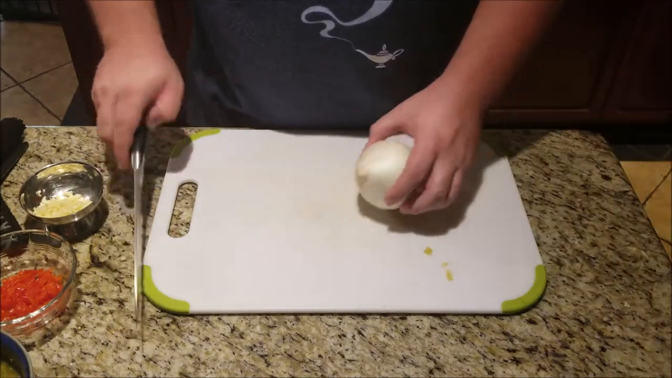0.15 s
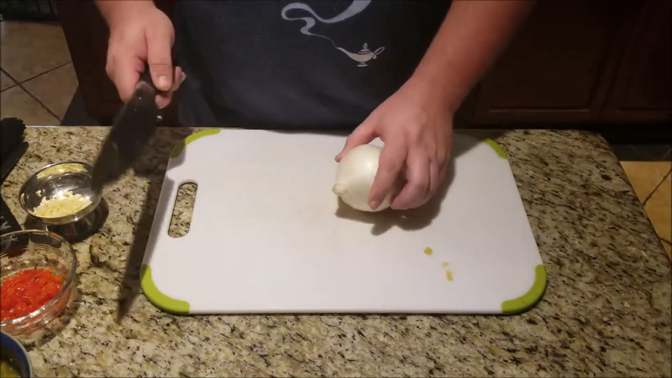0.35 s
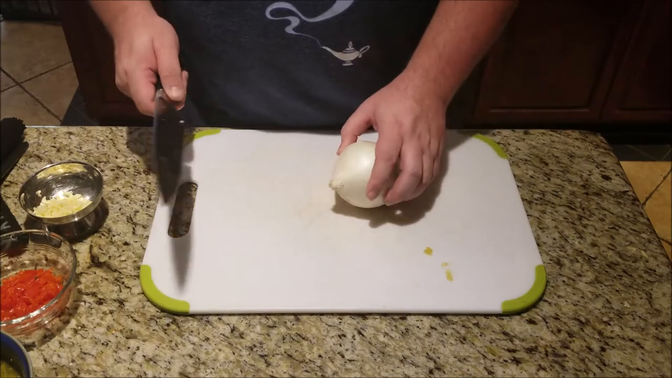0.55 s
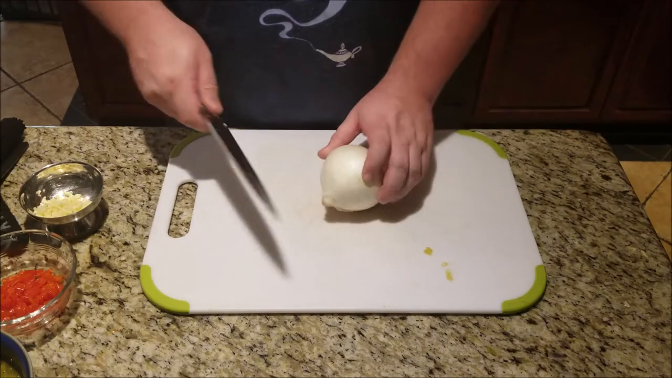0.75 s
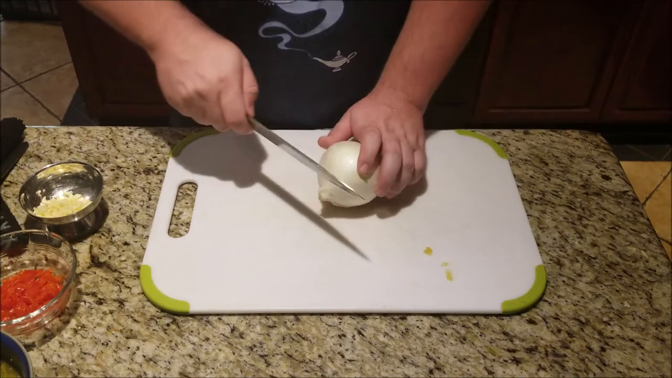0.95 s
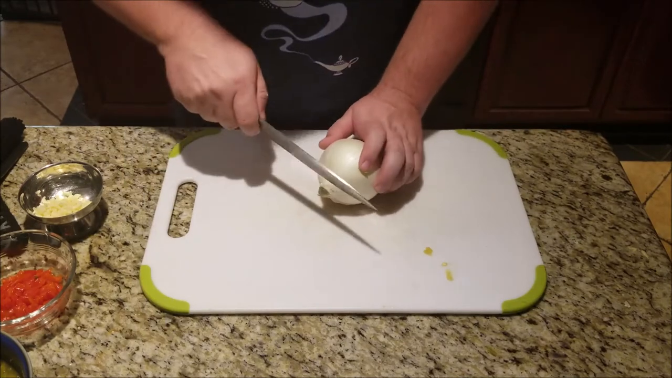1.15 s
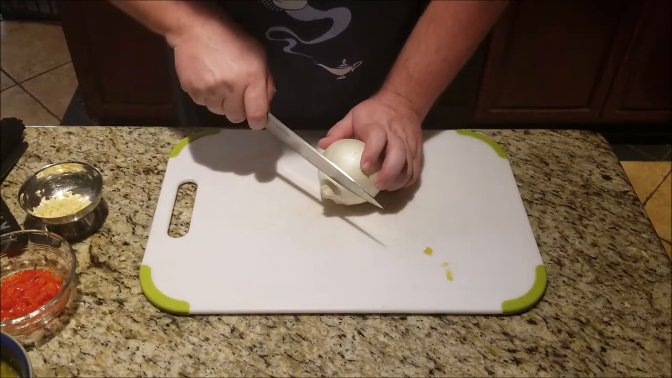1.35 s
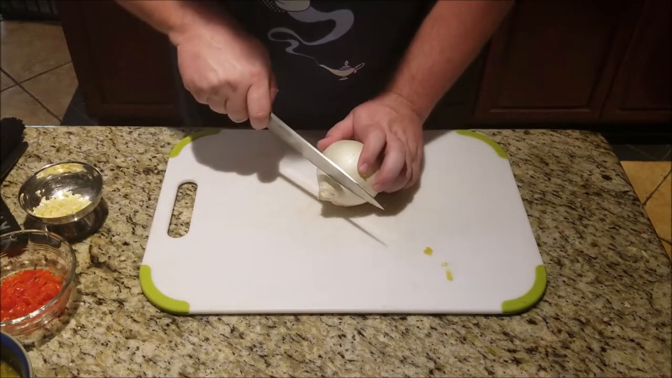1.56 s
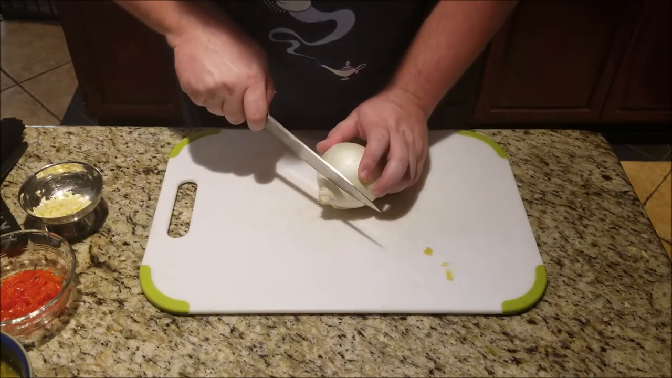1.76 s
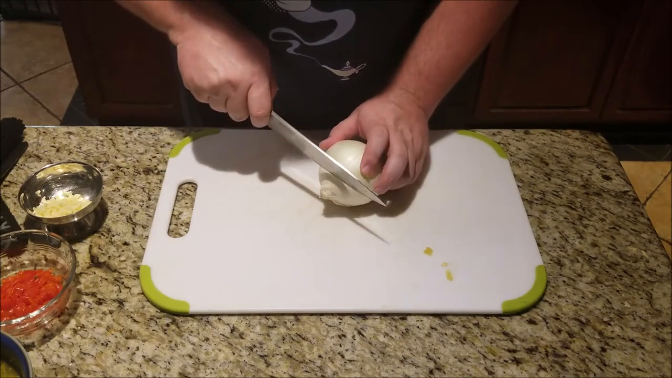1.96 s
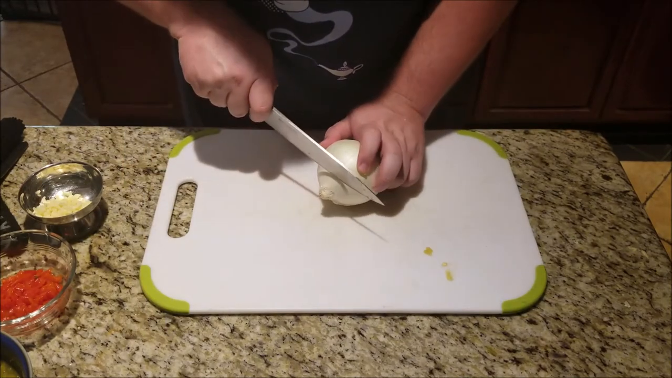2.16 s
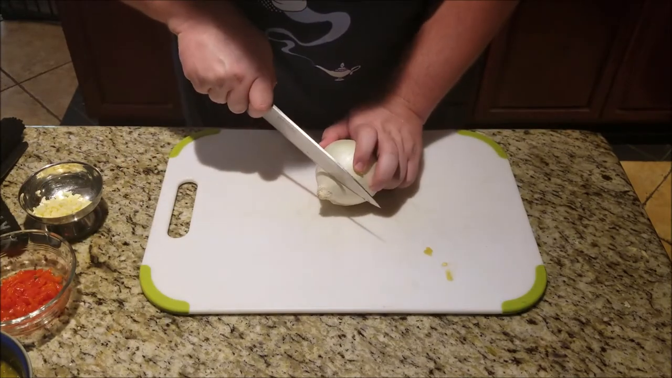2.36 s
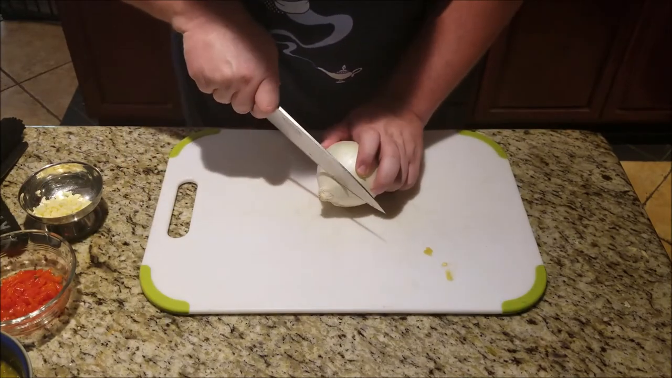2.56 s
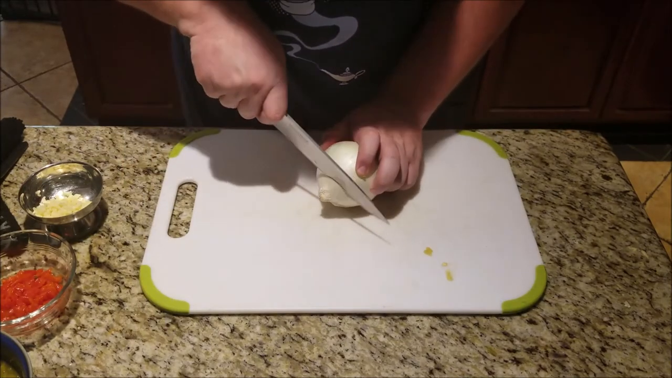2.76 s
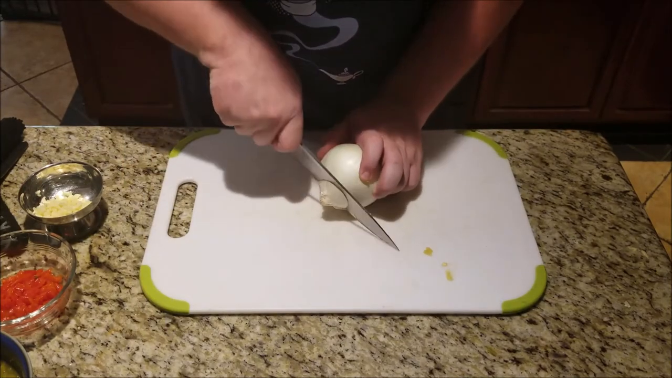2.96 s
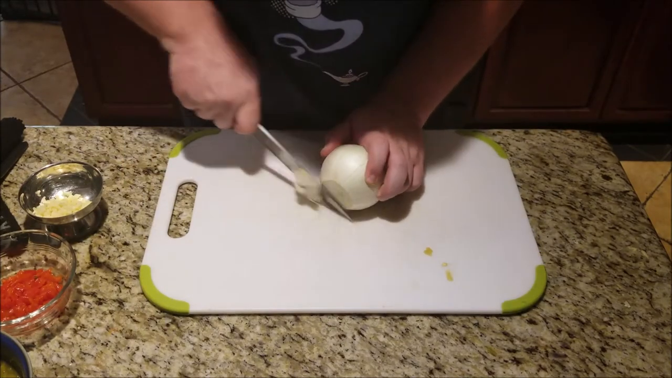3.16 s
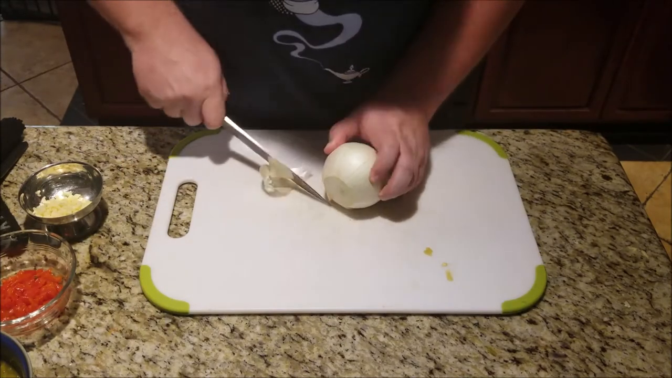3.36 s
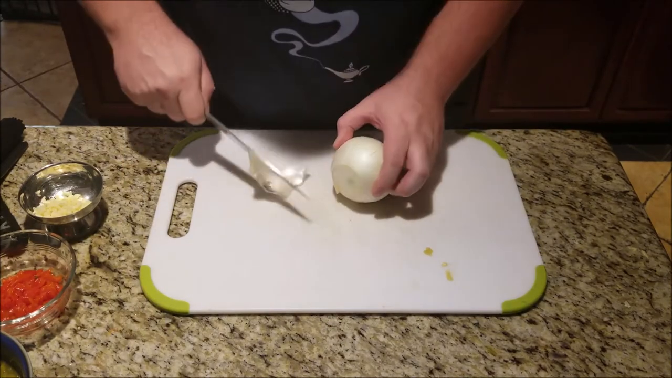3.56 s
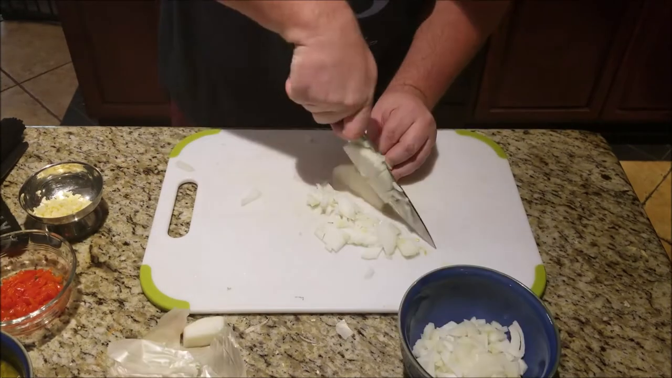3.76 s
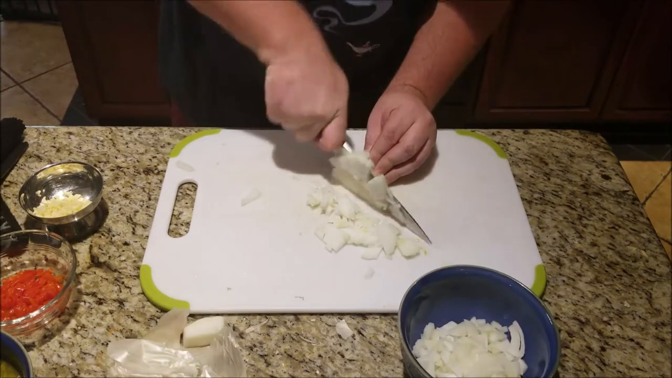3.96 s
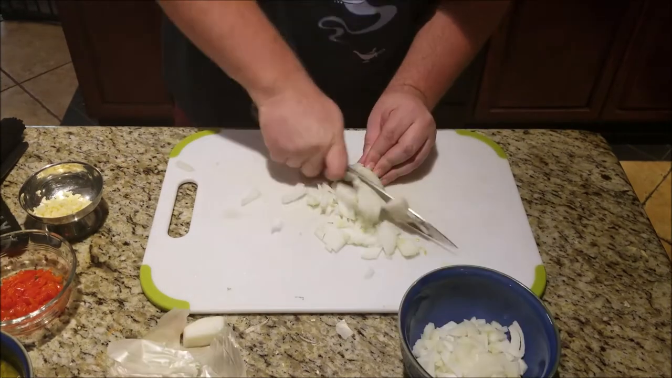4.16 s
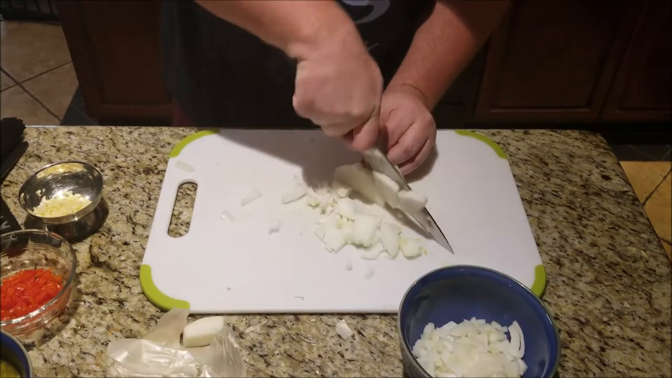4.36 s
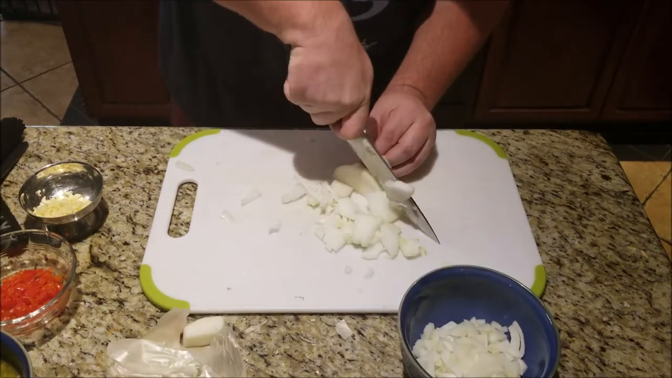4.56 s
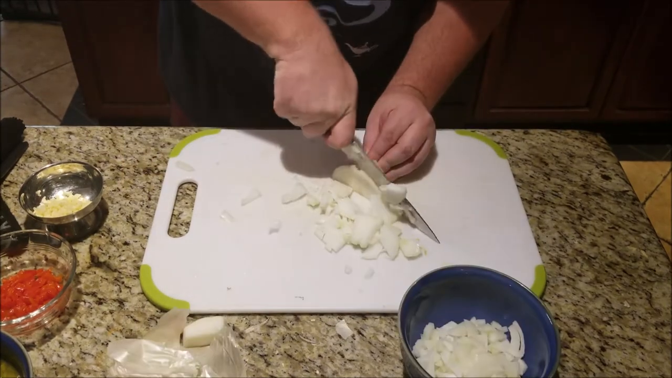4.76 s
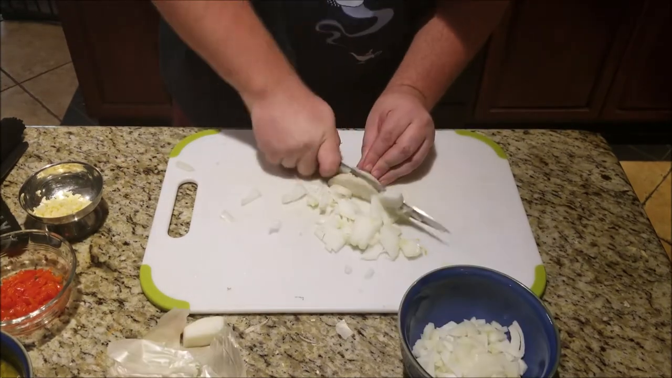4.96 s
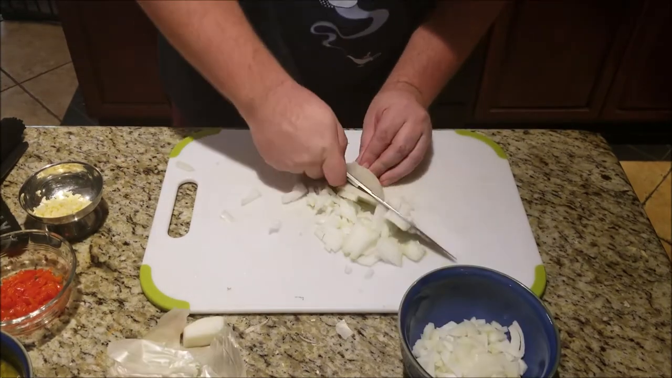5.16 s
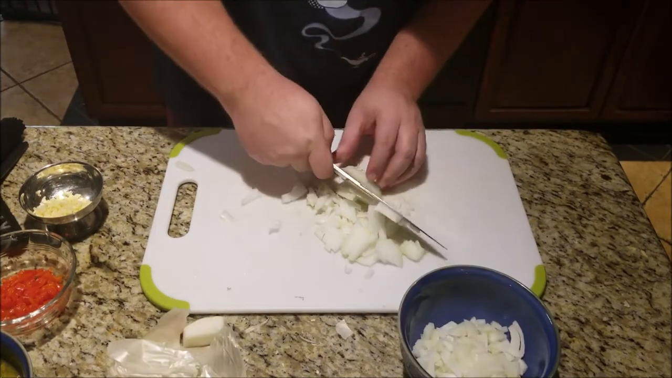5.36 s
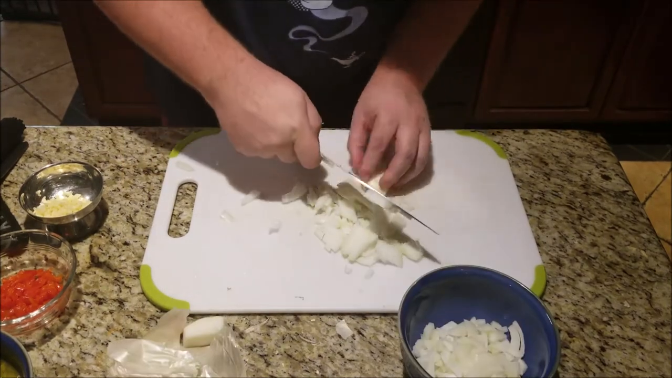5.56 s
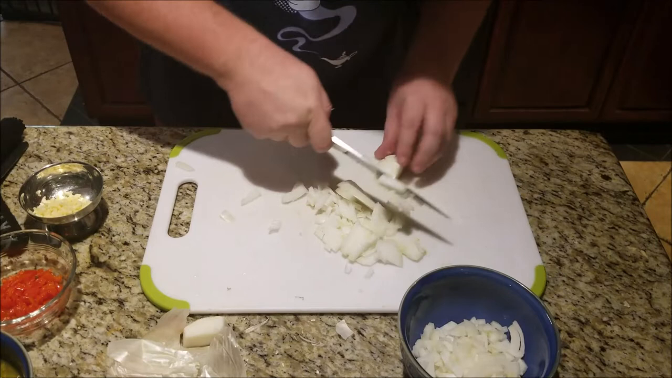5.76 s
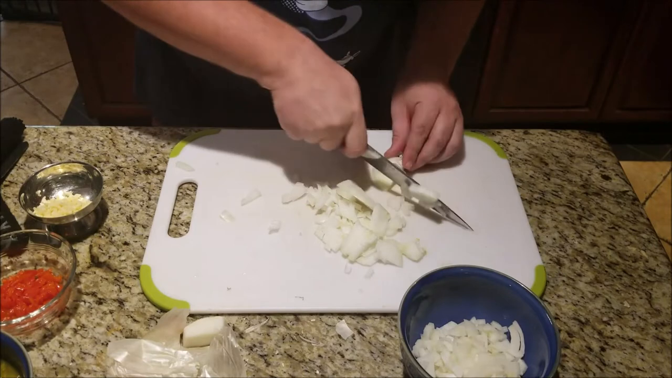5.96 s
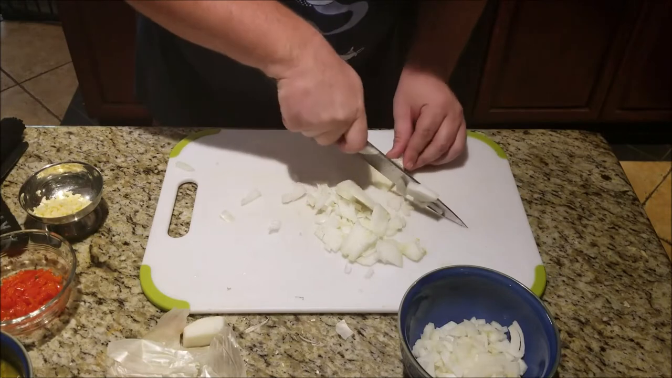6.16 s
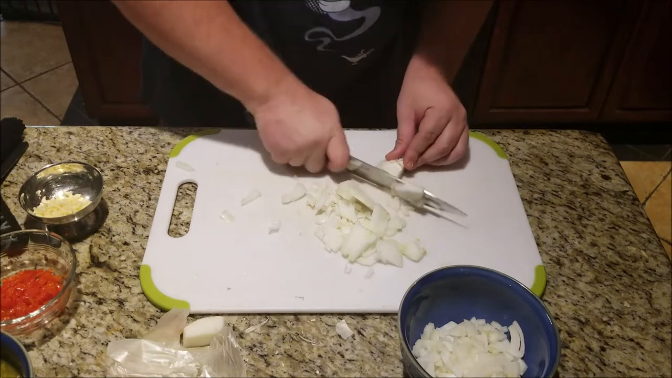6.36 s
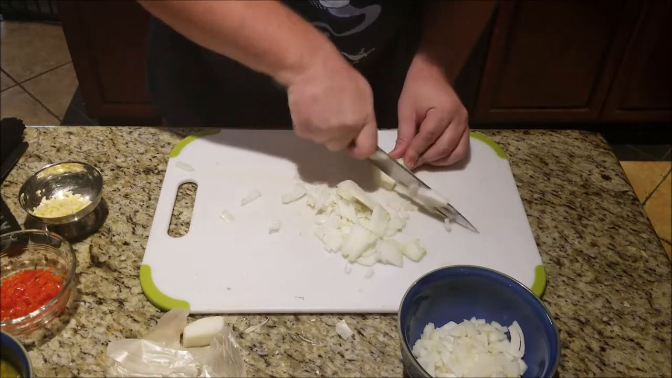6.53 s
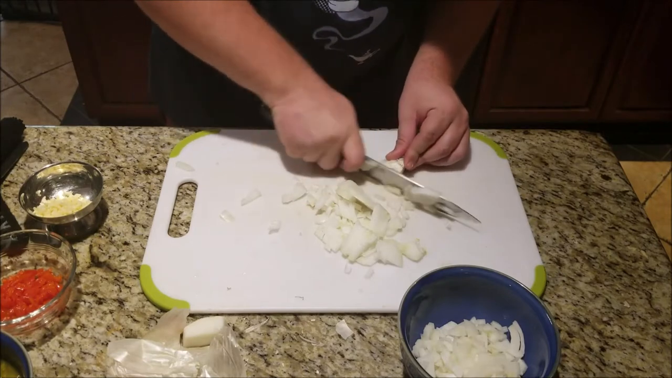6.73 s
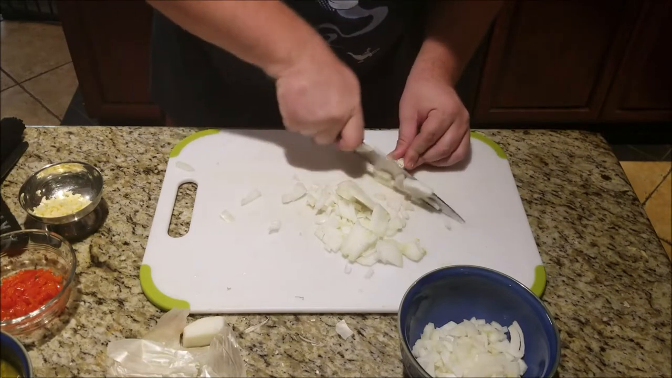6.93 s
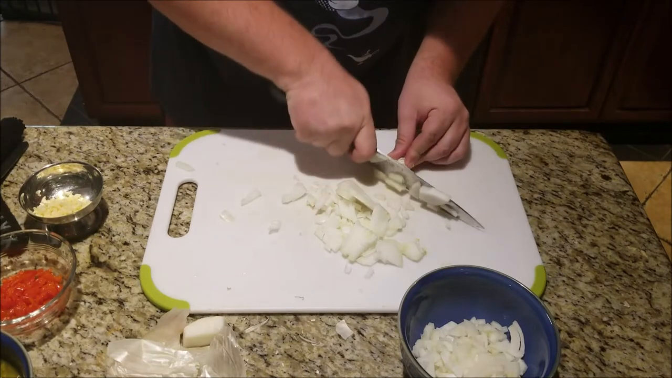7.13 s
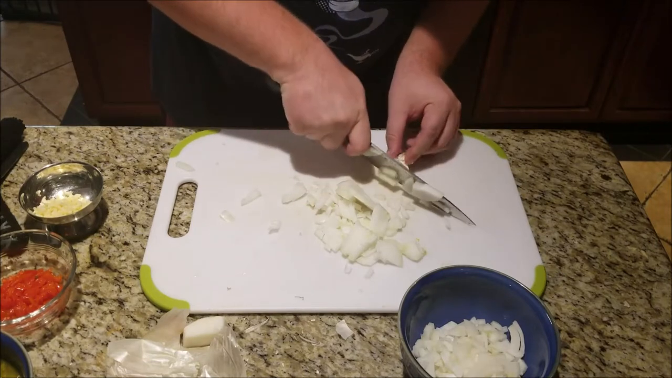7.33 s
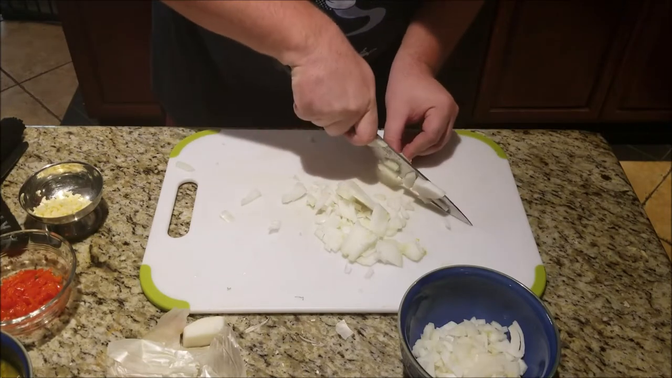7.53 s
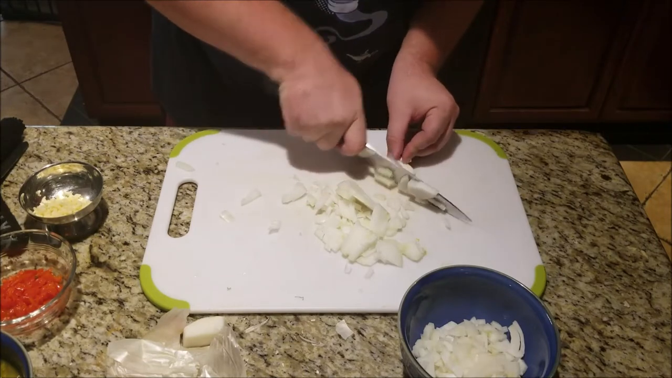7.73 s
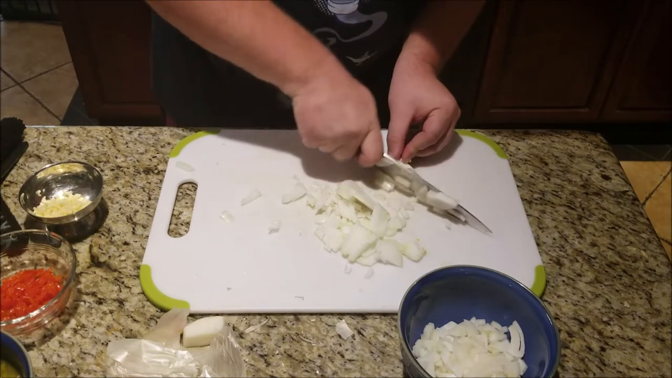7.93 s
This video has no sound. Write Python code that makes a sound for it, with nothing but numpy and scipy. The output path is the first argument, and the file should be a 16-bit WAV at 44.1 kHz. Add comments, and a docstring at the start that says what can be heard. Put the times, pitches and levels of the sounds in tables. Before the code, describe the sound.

A knife lifts off a stone counter with a thin, high metallic ring while an onion rolls softly onto a plastic board. After faint rustles, the blade crunches through in a loud burst of crackles and snaps with a sharp knock. A short lull follows, then dicing: irregular hollow knocks, some doubled, with wet crisp scrapes. Close stereo microphone, louder on the left, in a hard-walled kitchen with faint fridge hum.

```python
"""First a knife blade rings as it is lifted off a stone counter, while an onion rolls into place over a fridge hum.
Then skin and flesh crackle under the edge, which knocks and scrapes a plastic board lying on the stone.
Blade, board and counter are sums of resonances, struck or rubbed; crackle and scrape are noise of uneven grain.
A hard-walled kitchen answers with a diffuse echo; two microphone ports hear it, the left one louder."""
import sys
import numpy as np
from scipy import signal
from scipy.fft import rfft, irfft, next_fast_len
from scipy.io import wavfile
from scipy.ndimage import uniform_filter1d

SR = 44100
rng = np.random.default_rng(int(sys.argv[2]) if len(sys.argv) > 2 else 0)


def dump_mix(stems):
    """Bounce the given channels to the path in sys.argv[1] as a 16-bit WAV at rate SR."""
    frames = np.atleast_2d(stems).T  # one column per channel
    limited = np.clip(frames, -1, 1)  # hard clip at full scale
    pcm = np.round(limited * 32767).astype(np.int16)
    wavfile.write(sys.argv[1], SR, pcm)


def to_linear_factor(level_db):
    """Convert decibel levels (scalar or array-like) to linear amplitude factors."""
    exponent = np.asarray(level_db, float) / 20
    return 10 ** exponent


N = 352447
TIME = np.arange(N) / SR
PADDED = next_fast_len(N)
FREQ = np.arange(PADDED // 2 + 1) * SR / PADDED + 1e-3  # Hz, kept above zero

# Blade modes: f/Hz, level/dB before weighting by decay, t60/s
BLADE_MODES = [(7600, -14, .3), (8890, -12, .2), (10380, -14, .3), (10960, -9, .25), (11024, -6, .3),
               (11930, -8, .35), (12030, -7, .35), (12320, -6, .15), (12415, -2, .3), (12540, -2, .12),
               (13770, -2, .35), (13870, -7, .15), (14005, -5, .35), (15230, -8, .25)]
# Contact of blade and stone: t/s, level/dB
BLADE_CONTACT = [(0, -38), (.02, -37), (0.051, -53), (.085, -45.5), (.105, -72)]
# Moves of edge, fingers and onion: start t/s, length/s, crackle level/dB, its swell over the move/dB,
# level of the drag on the board/dB
MOVES = [(0., 0.018, -46.5, 8, -54.5), (0.051, 0.032, -50, 5.5, -53), (0.092, 0.15, -59.5, -9.5, -53.5),
         (0.258, .16, -65.5, 4, -68.5), (0.422, .1, -77, 1, -70), (.545, 0.12, -65, -7.5, -66.5),
         (0.644, .18, -77.5, 18.5, -61), (0.854, 0.1, -66, 4.5, -66.5), (1.046, .05, -61.5, -3.5, -87.5),
         (1.2, 0.42, -74, -11, -91.5), (1.581, .12, -65.5, -6.5, -102), (1.985, 0.33, -79, 13, -82),
         (2.313, 0.059, -57.5, -7.5, -68), (2.455, 0.081, -68.5, 6, -79.5), (2.574, .04, -54, 0, -72),
         (2.62, 0.032, -44.5, 4.5, -59.5), (2.751, .1, -31, -4, -50), (2.86, 0.029, -32, 5.5, -51.5),
         (2.887, 0.014, -34.5, -16, -32), (2.944, 0.11, -40.5, 5, -48.5), (3.033, 0.046, -31, 11.5, -48),
         (3.09, 0.12, -20, -13, -46.5), (3.317, 0.095, -95, -9, -65), (3.453, 0.011, -58.5, -2, -77),
         (3.808, 0.087, -76, 6, -69), (3.877, .13, -43, 11.5, -36), (3.996, .06, -36, 0, -36.5),
         (4.096, .14, -61.5, -2, -47), (4.299, .24, -75, -8, -62.5), (4.647, .065, -44.5, -6, -41.5),
         (4.711, 0.23, -42.5, 6, -32.5), (5.046, 0.099, -59.5, 0.5, -53), (5.399, 0.061, -79.5, 1.5, -74),
         (5.472, 0.071, -70.5, 8, -63.5), (5.556, 0.13, -72.5, 7, -64.5), (5.874, .1, -90, -4, -71.5),
         (5.993, .045, -57.5, -14.5, -36.5), (6.112, .17, -75.5, 8.5, -54), (6.314, .025, -48.5, 10.5, -40),
         (6.354, 0.084, -59, 2, -46.5), (6.543, .1, -62, 2, -56), (6.642, 0.034, -34.5, -2, -35.5),
         (6.845, .095, -68, 12, -51.5), (6.939, 0.059, -42, 7, -38.5), (7.148, .085, -72, 5.5, -58),
         (7.367, 0.13, -72.5, 3.5, -75), (7.728, .04, -70.5, 20, -74), (7.777, 0.035, -35, -13, -39),
         (7.86, 0.14, -58, -16, -54.5)]
# Spread of grain size, dry skin first, diced flesh after: t/s, level/dB per unit of size
GRAIN_SPREAD = [(0, -1.5), (3.3, 4.5), (3.6, 3), (8, -0.5)]
# Relative spectrum of crackle: f/Hz, level/dB
CRACKLE_SPECTRUM = [(2940, -17.5), (5000, -13), (6050, -13.5), (6520, -5), (7160, -7.5), (8880, -13.5),
                    (12600, -1), (15200, -4.5), (15900, -17.5), (16300, -24.5), (16500, -39.5)]
# Relative spectrum of scrape: f/Hz, level/dB
SCRAPE_SPECTRUM = [(710, -29), (1200, -10.5), (1880, -11.5), (2030, -6.5), (2240, -7.5), (2730, -9),
                   (6000, -12.5), (7800, -24), (13200, -120)]
# Board modes before the changes at each contact: f/Hz, level/dB, t60/s
BOARD_MODES = [(362, -13, .12), (431, -20, .12), (612, 0, .15), (668, -3, .12), (748, -10, .11),
               (828, -15, .11), (945, -15, .11), (1020, -19, .1), (1088, -13, .11), (1180, -15, .1),
               (1315, -16, .09), (1410, -19, .09), (1501, -14, .1), (1674, -18, .1), (1780, -17, .09),
               (1950, -23, .09), (2120, -23, .07), (2350, -23, .06)]
# Roll of the onion: t/s, level/dB
ONION_ROLL = [(0, -51.5), (.1, -50.5), (.4, -56), (.56, -58.5), (0.802, -58.5), (1.03, -59.5), (1.07, -73),
              (1.3, -72.5)]
# Resonances of the gap under the board: f/Hz, width/Hz, level/dB
HOLLOW_MODES = [(323.7, 5.1, 8), (376, 17, -4.5), (442.4, 29, -7.5), (894, 55, -16), (1430, 73, -20)]
# Fridge tones: f/Hz, middle level/dB rms, waver/dB
FRIDGE_TONES = [(51.3, -69, 1.5), (116.4, -68, 3), (147.2, -68.5, 2.5)]
# Relative spectrum of air and microphone hiss: f/Hz, level/dB
AIR_SPECTRUM = [(12, -46.5), (20, -28.5), (37, -2), (71, -6.5), (151, -6.5), (174, -10.5), (492, -14.5),
                (583, -32), (1210, -26), (1600, -43), (5360, -39), (6710, -29.5), (9410, -50.5),
                (13600, -28), (16500, -56)]
# Power share of the hiss common to both ports: f/Hz, share
AIR_LIKENESS = [(130, .92), (290, 0.91), (640, 0.29), (1400, .02)]
# Blows on the board: t/s, level/dB before the low cut, off-centre lift of side modes/dB, damping factor, #
# hardness lift of top modes/dB
KNOCKS = [(0.088, -31.5, 9, 2.3, 25), (0.107, -34, 12.5, 1.2, 13), (0.276, -40.5, 1, 1.4, 2),
          (2.622, -50, 9.5, 0.61, -1.5), (2.898, -5, 6.5, 1.95, 4.5), (3.002, -33.5, 6, 2, 9.5),
          (3.883, -27.5, -8, 1, -14), (3.905, -20.5, 13, 1.7, -4), (3.924, -18, 11.5, 1.24, -1),
          (4.067, -21, 30, 4.8, -2), (4.143, -31.5, -3, 2, -11), (4.186, -36.5, -3, 2.4, 1.5),
          (4.224, -39, 0, 1.2, -13.5), (4.34, -47.5, -2, 2.7, -6), (4.526, -44, -5, 1.9, -6),
          (4.65, -30, 5, 0.52, 1), (4.723, -13, 7.5, 1.75, -2.5), (4.744, -22, 12.5, 1.1, -4),
          (4.792, -22, 3, 0.59, -9), (4.958, -27.5, 23, 2.8, -7), (5.698, -38, -14, 2.2, -16.5),
          (5.885, -49.5, 13, 1.34, -2.5), (5.993, -9.5, 5.5, 1.57, 6), (6.314, -28, 10, 0.73, 8.5),
          (6.403, -33.5, 20.5, 1.7, 17), (6.643, -22, 13, 0.95, 7), (6.941, -31, 27, 2.9, 2.5),
          (6.961, -13.5, 9, 1.23, -2.5), (7.777, -34, 13, 1.3, 6), (7.808, -31.5, 17, 2.6, 2)]
# Thuds carried by the counter: t/s, peak level/dB, f/Hz, t60/s
THUDS = [(0.281, -42, 90, 0.36), (3.9, -47, 93.5, 0.48), (3.998, -50, 69.5, .3), (4.077, -45.5, 74, 0.26),
         (4.72, -48.5, 86, 0.58), (4.96, -49.5, 87, 0.35), (6.36, -49.5, 70, .3), (7.798, -49.5, 71, 0.37)]
# Snaps of skin and flesh: t/s, peak level/dB before colouring
SNAPS = [(0.8091, -45), (1.2613, -44), (1.405, -43.5), (1.5866, -45), (2.318, -35), (2.3496, -36.5),
         (2.52, -44), (2.579, -31.5), (2.614, -35.5), (2.7557, -12), (2.7743, -8.5), (2.8254, -19.5),
         (2.9, -10.5), (2.9225, -2.5), (2.9802, -20.5), (3.004, -15.5), (3.0313, -10), (3.042, -12),
         (3.067, -0.5), (3.0907, -3.5), (3.096, -5), (3.463, -41.5), (3.8087, -35.5), (6.9885, -9),
         (7.7244, -41)]
# Squeaks of wet flesh on steel: t/s, length/s, f/Hz, level/dB rms before the fades
SQUEAKS = [(2.098, 0.084, 2346, -76), (2.287, 0.04, 2270, -69.5), (2.457, 0.038, 2280, -70.5),
           (5.47, .1, 2797, -66.5), (7.542, 0.029, 5050, -66.5)]
# Power share of other noise common to both ports: f/Hz, share
LIKENESS = [(100, 0.97), (600, 0.75), (1500, 0.58), (3000, 0.047), (12000, .02)]
# Reverberation of the kitchen: f/Hz, t60/s
ROOM_DECAY = [(200, 0.17), (1000, 0.46), (5000, 0.54), (13000, 0.29)]
# Left port above right port: f/Hz, level/dB
LEFT_LEAN = [(60, 4.5), (600, 4.5), (1500, 4.5), (4000, 4.5), (12000, 6)]


def unit(x):
    """Normalisation: scale to rms 1."""
    return x / np.sqrt(np.mean(x ** 2))


def over(table, hz):
    """Interpolation: read a table of f/Hz and value on a log-frequency axis."""
    f, value = np.transpose(table)
    return np.interp(np.log(hz), np.log(f), value)


def shape(table):
    """Spectral envelope: gain of a table of f/Hz and level/dB, falling away below its lowest point."""
    return to_linear_factor(over(table, FREQ)) * np.minimum(FREQ / table[0][0], 1) ** 2


def colour(x, gain):
    """Linear filtering: multiply the spectrum by a gain given at every frequency."""
    return irfft(rfft(x, PADDED) * gain, PADDED)[..., :N]


def peak(hz, width):
    """Resonance: causal response of one mode, gain 1 at its centre."""
    return 1 / (1 + 1j * (FREQ ** 2 - hz ** 2) / (FREQ * width))


def ports(likeness):
    """Spatial coherence: noise at two ports, sharing a given part of its power at each frequency."""
    like = np.clip(over(likeness, FREQ), 0, 1)
    common, left, right = rfft(rng.standard_normal((3, PADDED)))
    own = np.array([left, right])
    return irfft(np.sqrt(like) * common + np.sqrt(1 - like) * own, PADDED)[:, :N]


def walk(rate):
    """Random modulation: levels drawn at a rate per second, joined by ramps; rms near 1."""
    k = int(SR / rate)
    steps = np.repeat(rng.standard_normal(N // k + 1), k)
    return unit(uniform_filter1d(steps, k)[:N])


def add(out, s, x):
    """Superposition: mix a sound in at time s."""
    i = int(s * SR)
    out[..., i:i + x.shape[-1]] += x[..., :N - i]


def ring(hz, db, t60, phase, rise_s):
    """Free vibration: a sum of damped modes with a short rise, peak 1."""
    t = TIME[:int(.4 * SR), None]
    decay = np.exp(-np.log(1000) * t / t60)
    x = (to_linear_factor(db) * np.sin(2 * np.pi * hz * t + phase) * decay).sum(1)
    x = x * (1 - np.exp(-t[:, 0] / rise_s))
    return x / np.abs(x).max()


def blade():
    """Friction-driven resonance: rough stone shakes the steel, which rings on once it is in the air."""
    s, db = np.transpose(BLADE_CONTACT)
    force = to_linear_factor(np.interp(TIME, s, db, right=-120))
    # a mode's bandwidth is about 2.2 / t60
    steel = sum(to_linear_factor(level) * np.sqrt(t60) * peak(hz, 2.2 / t60) for hz, level, t60 in BLADE_MODES)
    return unit(colour(ports(LIKENESS) * force, steel)) * np.sqrt(np.mean(force ** 2))


def efforts():
    """Power addition: levels of crackle and drag in dB; each move enters fast, holds and dies away."""
    attack, sag = 6000, 27.5  # dB/s: entry of every move; the drag tires while it lasts
    crackle_stop, drag_stop = 379, 168.5  # dB/s
    settle_db, settle = -24.5, 118.5  # dB, dB/s: cut pieces crackle on faintly after the edge stops
    rest_crackle_db, rest_drag_db = -78.5, -86  # hands are never quite still
    t = np.arange(0, N / SR + .002, .001)
    s, length, crackle_db, swell_db, drag_db = np.transpose(MOVES)[:, :, None]
    before = np.maximum(s - t, 0)
    during = np.clip(t - s, 0, length)
    after = np.maximum(t - s - length, 0)

    # the factor 2 in amp turns levels into powers
    stop = to_linear_factor(-2 * crackle_stop * after) + to_linear_factor(2 * (settle_db - settle * after))
    crackle = to_linear_factor(2 * (crackle_db + swell_db * during / length - attack * before)) * stop
    drag = to_linear_factor(2 * (drag_db - sag * during - drag_stop * after - attack * before))

    def level(power, rest_db):
        """Power sum of all moves and the rest level, in dB."""
        return np.interp(TIME, t, 10 * np.log10(power.sum(axis=0) + to_linear_factor(2 * rest_db)))

    return level(crackle, rest_crackle_db), level(drag, rest_drag_db)


def grain():
    """Granular fracture: tiny breaks of uneven size, with slow changes of loudness levelled out."""
    sizes = np.repeat(np.minimum(rng.exponential(size=N // 24 + 1), 5.5), 24)[:N]
    spread_db = np.interp(TIME, *np.transpose(GRAIN_SPREAD))
    grains = to_linear_factor(spread_db * (uniform_filter1d(sizes, size=16) - 2.5))
    # cell layers give way in uneven bunches
    grains = grains * to_linear_factor(2.2 * walk(120))
    return grains / np.sqrt(uniform_filter1d(grains ** 2, size=2000))


def strokes():
    """Friction and fracture: dense breaks hiss, scrape, and shake the board while the edge moves."""
    crackle_db, drag_db = efforts()
    crackle_share = 0.37  # part of the scrape level that follows crackle; the rest follows drag
    scrape_db = crackle_share * crackle_db + (1 - crackle_share) * drag_db - 3
    noise = ports(LIKENESS) * grain()
    hiss = to_linear_factor(crackle_db) * unit(colour(noise, shape(CRACKLE_SPECTRUM)))
    scrape = to_linear_factor(scrape_db) * unit(colour(noise, shape(SCRAPE_SPECTRUM)))

    # rubbing drives the board without pause, so the modes sound broader than after a blow
    board = 0
    for k, (hz, db, t60) in enumerate(BOARD_MODES):
        rubbed_db = db - 0.94 * (abs(hz - 650) > 60)
        board = board + (-1) ** k * to_linear_factor(rubbed_db) * peak(hz, 5.0 / t60)
    board = board / (1 + (FREQ / 2300) ** 6)
    force = ports(LIKENESS) * to_linear_factor(drag_db + 4.82 * walk(40))
    drag = unit(colour(force, board)) * np.sqrt(np.mean(to_linear_factor(drag_db) ** 2))
    return hiss + scrape + drag


def onion():
    """Cavity resonance: an uneven roll hums in the gap under the board."""
    s, db = np.transpose(ONION_ROLL)
    push = ports(LIKENESS) * to_linear_factor(1.1 * walk(16))
    gap = sum(to_linear_factor(level) * peak(hz, width) for hz, width, level in HOLLOW_MODES)
    return unit(colour(push, gap)) * to_linear_factor(np.interp(TIME, s, db, right=-120))


def kitchen():
    """Steady sources: fridge tones wavering in level and phase over air and microphone hiss."""
    hum = 0
    for hz, db, waver_db in FRIDGE_TONES:
        level = np.sqrt(2) * to_linear_factor(db + waver_db * walk(13))
        hum = hum + level * np.sin(2 * np.pi * hz * TIME + 0.41 * waver_db * walk(10))
    air = unit(colour(ports(AIR_LIKENESS), to_linear_factor(over(AIR_SPECTRUM, FREQ))))
    return hum + to_linear_factor(-63.5) * air


def knocks():
    """Modal excitation: each blow rings the board modes in its own mix; board slaps stone with a clack."""
    low_share, clack_db = 0.65, -16  # off-centre lift taken under 500 Hz; burst level relative to the blow
    out, clacks = np.zeros((2, N)), np.zeros((2, N))
    hz, db, t60 = np.transpose(BOARD_MODES)
    for s, top_db, off_db, damp, hard_db in KNOCKS:
        mix, phase, shift, skew = rng.standard_normal((4, len(hz)))
        lift_db = np.select([hz < 500, hz < 900, hz < 1250], [low_share * off_db, 0, off_db], hard_db)
        mode_db = db + 2.0 * mix + lift_db
        # hand and onion load the board a little differently at every blow
        loaded_hz = hz * (1 + .006 * shift)
        # the higher modes reach the two ports out of step
        phases = .6 * phase + np.outer([1, -1], skew * hz / 3000)
        blow = np.array([ring(loaded_hz, mode_db, t60 / max(damp, .2), p, .0005) for p in phases])
        add(out, s, to_linear_factor(top_db) * blow)
        burst = rng.standard_normal((3, 2000)) * np.exp(-TIME[:2000] / 0.0014)
        add(clacks, s, to_linear_factor(top_db + clack_db) * (burst[0] + 0.86 * burst[1:]))
    # the blows carry little below about 260 Hz
    low_cut = 1 / (1 + 260 / (1j * FREQ)) ** 2
    slap = peak(650, 2000) + to_linear_factor(-20) * peak(4500, 4000)
    return colour(out, low_cut) + colour(clacks, slap)


def counter():
    """Structure-borne sound: heavy moves thump the cabinet under the stone."""
    out = np.zeros(N)
    for s, db, hz, t60 in THUDS:
        add(out, s, to_linear_factor(db) * ring(hz, 0, t60, 0, 0.0023))
    return out


def snaps():
    """Impulsive fracture: single fibres break in bursts of about a millisecond, coloured as the crackle."""
    out = np.zeros((2, N))
    for s, db in SNAPS:
        burst = rng.standard_normal((2, 300)) * np.exp(-TIME[:300] / 0.00058)
        add(out, s, to_linear_factor(db) * burst / np.abs(burst).max())
    return colour(out, unit(shape(CRACKLE_SPECTRUM)))


def squeaks():
    """Amplitude modulation: a fluttering tone spreads into a short narrow band."""
    out = np.zeros((2, N))
    for s, length, hz, db in SQUEAKS:
        k = int(length * SR)
        flutter = uniform_filter1d(rng.standard_normal((2, k)), size=300)
        band = unit(flutter * np.sin(2 * np.pi * hz * TIME[:k]))
        add(out, s, to_linear_factor(db) * band * np.hanning(k) ** .5)
    return out


def room(x):
    """Diffuse reverberation: octave bands of noise that each die at their own rate."""
    noise, tail, t = ports(LIKENESS), 0, TIME[:SR]
    for hz in 125 * 2. ** np.arange(8):
        band = colour(noise, np.exp(-np.log2(FREQ / hz) ** 2 * 2))[:, :SR]
        tail = tail + band * np.exp(-np.log(1000) * t / over(ROOM_DECAY, hz))
    tail = tail * np.clip(t / 0.0023, 0, 1)
    tail = tail / np.sqrt(np.sum(tail ** 2) / 2)  # mean energy 1 per port
    return to_linear_factor(-8) * signal.fftconvolve(x, tail, axes=1)[:, :N]


def scene():
    """Superposition: everything on the board, its echo and the room tone."""
    near = blade() + strokes() + onion() + knocks() + counter() + snaps() + squeaks()
    return near + room(near) + kitchen()


def band_limit(x):
    """A steep low-pass at the top of the band."""
    return signal.sosfilt(signal.butter(12, 16860, fs=SR, output="sos"), x)


def record(dry):
    """Directivity and saturation: the left port faces the board, the top is cut, loud snaps are rounded."""
    lean_db = over(LEFT_LEAN, FREQ) / 2
    top_cut = 1 + (FREQ / 15950) ** 200
    heard = colour(dry, to_linear_factor(np.array([lean_db, -lean_db])) / top_cut)
    return band_limit(np.tanh(heard))


dry = scene()
out = record(dry)
dump_mix(out)
```